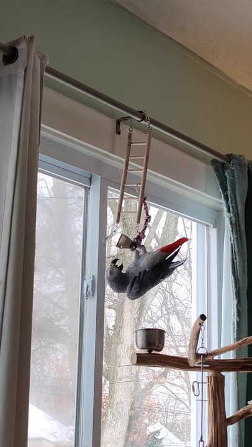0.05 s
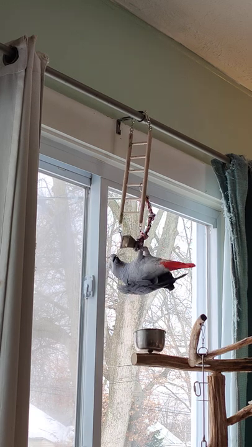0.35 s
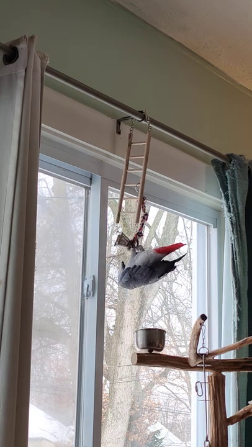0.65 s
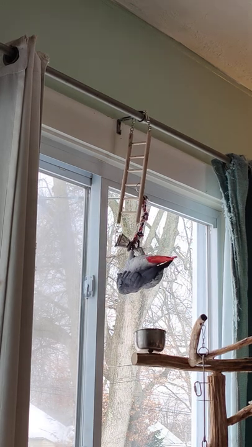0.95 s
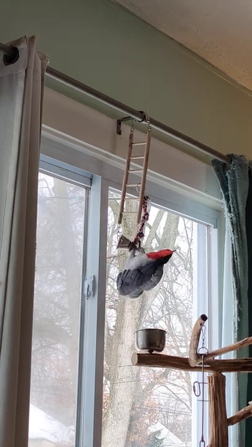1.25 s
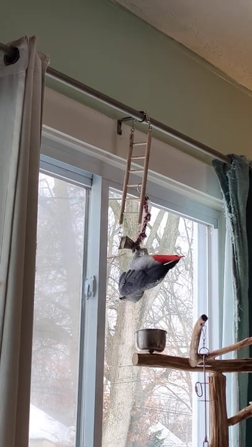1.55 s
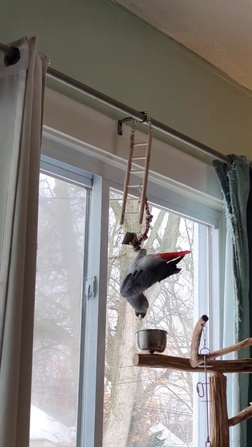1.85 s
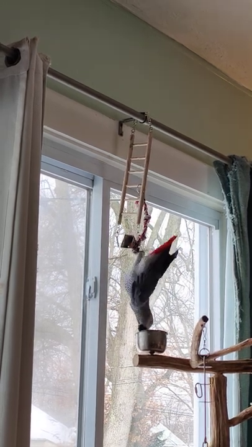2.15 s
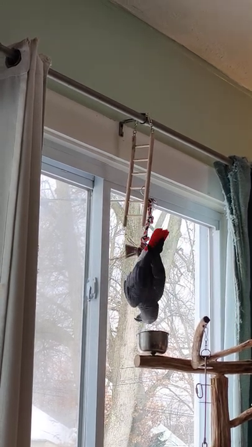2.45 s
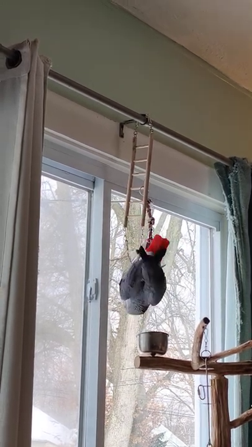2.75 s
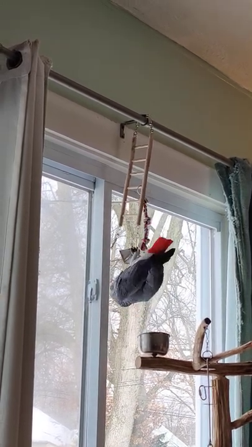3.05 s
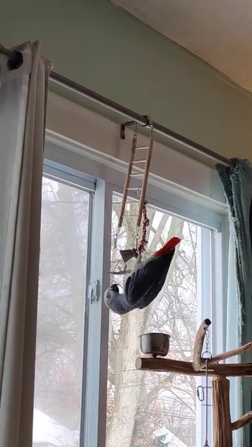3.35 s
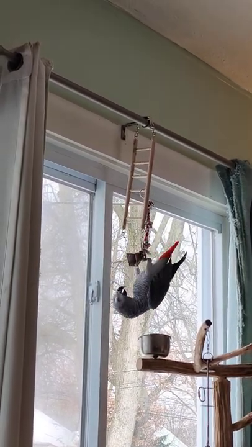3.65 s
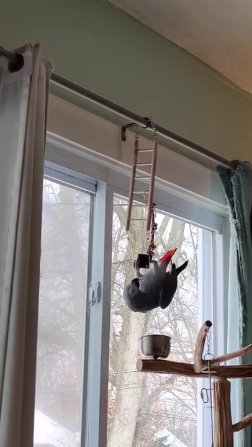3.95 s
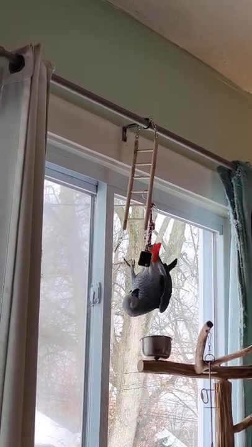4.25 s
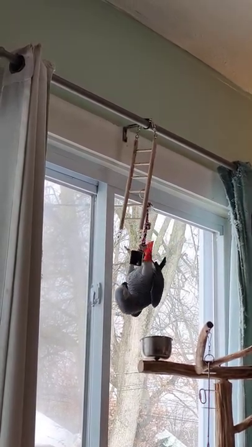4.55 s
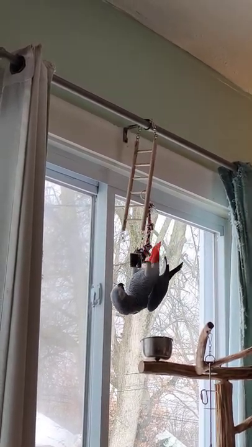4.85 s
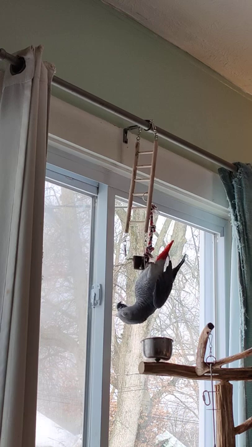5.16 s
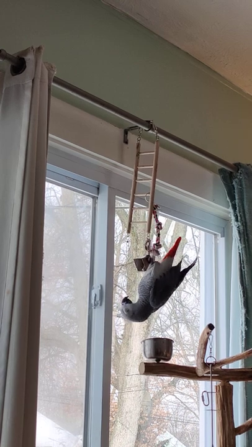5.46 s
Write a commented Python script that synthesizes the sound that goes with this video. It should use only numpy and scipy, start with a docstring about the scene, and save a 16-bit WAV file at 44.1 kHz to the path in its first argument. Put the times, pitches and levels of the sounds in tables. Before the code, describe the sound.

Bright, quickly damped clinks of a little toy bell, light claw ticks and a soft hoot as a parrot clambers, over faint ventilation hum.

```python
"""A small metal bell on a hanging toy, knocked by a clambering parrot in a quiet living room. The clapper
chatters and the bird's grip damps the ring; claws tick, the chain rustles, wooden parts knock and the beak
strikes the steel food bowl. A faint squeak and one soft hoot fall in between, over humming ventilation and a
faint hiss. One microphone, far enough from the toy to pick up more room than direct sound."""
import sys
import numpy as np
from scipy import signal
from scipy.fft import rfft, irfft, next_fast_len
from scipy.io import wavfile

SR = 44100
rng = np.random.default_rng(int(sys.argv[2]) if len(sys.argv) > 2 else 0)


def to_wav(s):
    """Save 16-bit WAV."""
    ch = np.atleast_2d(s).T  # columns
    pcm = np.round(np.clip(ch, -1, 1) * 32767)  # PCM
    wavfile.write(sys.argv[1], SR, pcm.astype(np.int16))


N = 247401
T = np.arange(SR // 2) / SR  # time within one hit, s

# clapper blows: t/s, strength/dB, hardness as tilt/(dB per octave), grip 0-1, place (-1 shoulder, 1 rim)
CLAPPER_BLOWS = [(.182, -37.5, 2, .25, -0.23), (.307, -36, -9, 0.99, 0), (.322, -34.5, -5, 0.9, -0.3),
                 (.372, -35, 6.5, 1, -0.61), (.488, -15.5, 1.5, 0.3, 0.33), (.524, -16, -3.5, .4, -0.3),
                 (.678, -37, 4, 0.5, 0.52), (.760, -42, -1.5, 0.98, -0.75), (.801, -19.5, 5, 0.18, 0.054),
                 (.812, -31, 5, 0.3, .2), (.930, -48, 5.5, 0.5, -1.3), (.957, -37.5, 0.5, 0.38, 0.3),
                 (1.050, -57.5, -10.5, 0.36, .5), (2.206, -40, 2, 0.8, -0.038),
                 (2.655, -37.5, 3.5, 0.29, 0.37), (2.730, -40.5, -2, .3, -0.35),
                 (2.798, -50, -3, 0.6, -0.2), (3.02, -52.5, -13, .8, 0.08), (3.176, -54, -1, 0.82, 0.73),
                 (3.530, -59.5, -6, 0.74, 0.23), (3.758, -29, -5, 0.5, -0.45),
                 (3.793, -41.5, 3, 0.3, -0.13), (3.975, -40.5, -10, .4, -1.05),
                 (4.045, -48, -7.5, 0.6, -1.4), (4.172, -47.5, -12, 0.41, -.8),
                 (5.122, -55.5, -4.5, 0.7, 0.064), (5.528, -53, -23, .3, 0.075),
                 (5.562, -50.5, 5, 0.63, -0.76)]
# bell modes, the strike note and three overtone groups: f/Hz, level/dB, t60/s
STRIKE_NOTE = [(2396, -3.5, .06), (2424, 0, .18)]
LOW_MODES = [(1357, -28, .33), (4338, -1, .15), (5005, 1, .17)]
MID_MODES = [(5500, -6, .17), (5803, 0, .13), (6045, -3, .14), (6260, -9, .07), (6790, -11, .03)]
TOP_MODES = [(7850, -13, .16), (8522, -21, .08), (9160, -5, .05), (9250, -1.5, .09), (9650, -15, .04),
             (10563, 0, .16), (11640, -8, .09), (11900, -13, .04), (12503, 1, .12), (12660, -11, .05),
             (13100, -11, .05), (13931, -9, .05), (14006, -2, .12), (14720, -20, .04), (15400, -18, .03)]
# low, mid and top group against the note: hanging free/dB, added by full grip/dB, added at the rim/dB
OVERTONE_BALANCE = [(-9.5, -8.5, 8.5), (-19.5, 4.5, -8.5), (-12.5, -1, 0.5)]
# beak and claw strokes on the toy: t/s, strength/dB
CLAW_STROKES = [(2.395, -47), (2.48, -45.5), (2.902, -49.5), (3.145, -53.5), (3.348, -51), (3.375, -42.5),
                (3.682, -52), (3.902, -51), (4.784, -49), (4.849, -55), (5.081, -56.5), (5.298, -53.5),
                (5.374, -46), (5.394, -47), (5.486, -64)]
# modes of one chain link: f/Hz, level/dB, t60/s
LINK_MODES = [(4840, -4.5, 0.08), (6295, 3, .04), (7220, 0, .04), (7960, -9.5, .03)]
# links shifting under the bird: t/s, level/dB
CHAIN_MOTION = [(2.3, -71), (2.66, -64.5), (2.97, -75), (3.49, -76), (3.97, -70), (4.12, -72.5),
                (4.41, -80), (5.36, -81.5), (5.49, -67), (5.61, -67)]
# knocks: wooden parts colliding, and at 2.146 s the beak striking the steel food bowl: t/s, strength/dB, snap
# against the knock/dB
CLACKS = [(.322, -49, -3), (2.146, -41, -3.5), (2.205, -47, 2)]
# spectra: f/Hz, relative density/dB
CRACK_SPECTRUM = [(300, -46.5), (900, -25), (1500, -13), (2400, 11), (3600, -4.5), (5800, 4.5),
                  (7500, -5.5), (10000, -3.5), (13500, -4), (16000, -4.5)]  # clapper on the bell wall
CLAW_SPECTRUM = [(500, 1.5), (1500, -1.5), (2500, 4.5), (3400, 5), (4100, 2.5), (4700, 6.5), (5400, -14.5),
                 (6200, 3), (7200, 1), (8600, -7.5), (10500, -2.5), (12500, -10), (15500, -5.5)]  # beak and claws on the toy
CHAIN_SPECTRUM = [(1500, -10.5), (3400, 3), (4100, -10.5), (4750, 4.5), (5500, -9), (6200, 0), (7100, -1),
                  (8600, -12.5), (11000, -9.5), (15000, -15.5)]  # link against link
WOOD_SPECTRUM = [(400, -34), (720, -15), (950, 0), (1300, 3), (1600, 0.5), (1950, 1), (2300, -15.5),
                 (4000, -22), (8000, -37), (12000, -44)]  # hollow body of a knock
SNAP_SPECTRUM = [(3000, -28), (8300, -17.5), (9600, 0.5), (11500, -3.5), (13700, 4), (16000, 0)]  # its bright edge
AIR_SPECTRUM = [(13, -44.5), (22, -13), (108, -7.5), (146, -19), (257, -4.5), (285, -6.5), (354, -15.5),
                (391, -15.5), (584, -25), (1200, -47), (1560, -72.5), (2640, -120)]  # ventilation airflow
HISS_SPECTRUM = [(530, -27), (900, -1.5), (1920, -5), (3130, -13.5), (4820, -19.5), (5630, -25.5),
                 (6990, -17.5), (8780, -19.5), (9660, -17.5), (14900, -16), (15800, -10.5)]  # background hiss
# duct and fan resonances: f/Hz, width/Hz, level/dB
DUCT_RESONANCES = [(40.8, 10, -57.5), (122, 22, -59.5), (219, 43, -61.5), (259.27, 4, -51.5),
                   (343.5, 30, -58.5), (367, 32, -58), (449, 64, -60.5), (543.4, 84, -62), (783, 87, -70.5)]
# living room reverberation: f/Hz, t60/s
ROOM_DECAY = [(200, 0.19), (1400, 0.44), (2400, 0.37), (6000, 0.3), (10000, 0.25), (16000, 0.26)]


def bell(crack_db=-18, crack_grip_db=14, crack_octaves=1.1):
    """Harder blows favour high modes; rebounds stir only the mid and top groups and the metal's crack."""
    out = np.zeros(N)
    for s, db, hardness, grip, place in CLAPPER_BLOWS:
        path = room_path(direct_db=-8)
        rattle = signal.fftconvolve(path, chatter())
        add(out, s, amp(db) * ring(STRIKE_NOTE, grip, path, swell_cycles=8))
        groups = zip((LOW_MODES, MID_MODES, TOP_MODES), OVERTONE_BALANCE, (path, rattle, rattle))
        for modes, (free_db, grip_db, rim_db), drive in groups:
            group_db = free_db + grip_db * grip + rim_db * place + hardness * octaves_up(modes)
            add(out, s, amp(db + group_db) * ring(modes, grip, drive))
        crack = at_mic(struck(burst(t60=.0078), CRACK_SPECTRUM), rattle)
        add(out, s, amp(db + crack_db + crack_grip_db * grip + hardness * crack_octaves) * crack)
    return out


def ring(modes, grip, path, swell_cycles=3.5, grip_damping=1.4, grip_sharpening=.018):
    """Metal modes ring as damped sines; a grip stiffens the metal, raising the pitch, and damps it."""
    hz, db, t60 = np.transpose(modes)[:, :, None]
    size = amp(db + rng.standard_normal(hz.shape))
    swell = 1 - np.exp(-T * hz / swell_cycles)
    fade = amp(-60 * T * np.exp(grip_damping * grip) / t60)
    partials = swell * fade * np.sin(2 * np.pi * hz * (1 + grip_sharpening * grip ** 2) * T)
    sign = rng.choice([-1, 1], hz.shape)  # depends on where the blow lands
    return unit_hit(np.sum(sign * size * at_mic(partials, path), axis=0))


def chatter(gap_s=.007, bounce_db=-4, rebounds=6):
    """A contact and its weaker rebounds at uneven gaps."""
    delays = np.cumsum(gap_s * rng.uniform(.5, 1.5, rebounds))
    samples = np.round(np.r_[0, delays] * SR).astype(int)
    return np.bincount(samples, amp(bounce_db * np.arange(rebounds + 1)))


def octaves_up(modes):
    """How far a group of modes lies above the strike note."""
    hz, db, _ = np.transpose(modes)
    return np.average(np.log2(hz / STRIKE_NOTE[-1][0]), weights=amp(db))


def claws(grit_db=-14, clink_db=-19.5, rise_s=.0092, size_spread=.0703):
    """Short gritty strokes of beak and claws, each jolting a link of slightly different size."""
    out = np.zeros(N)
    for s, db in CLAW_STROKES:
        path = room_path()
        grit = burst(t60=.06) * rng.exponential(1, len(T)) * (1 - np.exp(-T / rise_s))
        add(out, s, amp(db + grit_db) * at_mic(struck(grit, CLAW_SPECTRUM), path))
        link = np.array(LINK_MODES) * [np.exp(size_spread * rng.standard_normal()), 1, 1]
        rattle = signal.fftconvolve(path, chatter())
        add(out, s, amp(db + clink_db) * ring(link, grip=0, path=rattle))
    return out


def chain(contacts_per_s=260):
    """Many tiny contacts of links and beads blur into a rustle."""
    contacts = (rng.random(N) < contacts_per_s / SR) * rng.standard_normal(N)
    in_room = signal.fftconvolve(contacts, room_path())[:N]
    level_db = np.interp(np.arange(N) / SR, *np.transpose(CHAIN_MOTION), left=-120, right=-120)
    return amp(level_db) * unit(coloured(in_room, CHAIN_SPECTRUM))


def knocks():
    """Wooden parts of the toy collide, and once the beak strikes the steel food bowl: a hollow clack with a
    bright snap on top."""
    out = np.zeros(N)
    for s, db, snap_db in CLACKS:
        path = room_path()
        add(out, s, amp(db) * at_mic(struck(burst(t60=.003), WOOD_SPECTRUM), path))
        add(out, s, amp(db + snap_db) * at_mic(struck(burst(t60=.02), SNAP_SPECTRUM), path))
    return out


def hoot(start_s=3.705, length_s=.37, pitch_hz=406.5, sag_hz_per_s=60, gain_db=-36, fade_db_per_s=-16):
    """A soft, dry tone with a faint octave; it swells, fades and sinks a little."""
    out = np.zeros(N)
    phase = 2 * np.pi * np.cumsum(pitch_hz - sag_hz_per_s * T) / SR
    tone = np.sqrt(2) * (np.sin(phase) + amp(-28) * np.sin(2 * phase))
    swell = np.sin(np.pi * np.minimum(T / length_s, 1)) * amp(gain_db + fade_db_per_s * T)
    add(out, start_s, swell * tone)
    return out


def squeak(start_s=1.335, length_s=.02, pitch_hz=790, gain_db=-57):
    """A faint short squeak as the toy swings."""
    out = np.zeros(N)
    tone = np.sin(2 * np.pi * pitch_hz * T) * np.sin(np.pi * np.minimum(T / length_s, 1))
    add(out, start_s, amp(gain_db) * at_mic(tone, room_path(direct_db=-5)))
    return out


def ventilation(air_db=-50):
    """Room tone: broad air noise and the narrow hum of duct and fan resonances."""
    out = amp(air_db) * unit(coloured(rng.standard_normal(N), AIR_SPECTRUM))
    for centre, width, db in DUCT_RESONANCES:
        hum = filtered(rng.standard_normal(N), lambda hz: 1 / (1 + ((hz - centre) / width * 2) ** 2))
        out += amp(db) * unit(hum)
    return out


def hiss(level_db=-67):
    """A faint steady noise floor behind everything."""
    return amp(level_db) * unit(coloured(rng.standard_normal(N), HISS_SPECTRUM))


def room_path(direct_db=-7):
    """Toy to microphone: direct sound and diffuse tail; the toy swings, so each hit takes a new path."""
    hz, t, noise = signal.stft(rng.standard_normal(len(T)), SR, nperseg=256)
    decay = amp(-60 * t / along(ROOM_DECAY, hz)[:, None])
    tail = signal.istft(noise * decay, SR, nperseg=256)[1][:len(T)]
    return tail / np.linalg.norm(tail) + amp(direct_db) * (T == 0)


def at_mic(x, path):
    """A hit carried along a path to the microphone, at level 1."""
    return unit_hit(irfft(rfft(x) * rfft(path, len(T)), len(T)))


def struck(x, spectrum):
    """A hit through a body with a (f/Hz, level/dB) spectrum, which rings only after the contact."""
    log_gain = np.log(amp(along(spectrum, np.fft.rfftfreq(len(T), 1 / SR))))
    cepstrum = irfft(log_gain, len(T))
    cepstrum[1:] *= 2 * (T[1:] < T[-1] / 2)  # minimum phase
    return irfft(rfft(x) * np.exp(rfft(cepstrum)), len(T))


def burst(t60):
    """Noise that falls 60 dB in t60 seconds."""
    return rng.standard_normal(len(T)) * amp(-60 * T / t60)


def amp(db):
    """Decibels to gain."""
    return 10 ** (np.asarray(db) / 20)


def unit(x):
    """Scale to rms 1."""
    return x / np.sqrt(np.mean(x ** 2) + 1e-20)


def unit_hit(x):
    """Scale each hit to the energy of 50 ms at rms 1."""
    return x / np.sqrt(np.sum(x ** 2, axis=-1, keepdims=True) / (SR / 20) + 1e-20)


def along(points, hz):
    """Interpolate (f/Hz, value) points on a log frequency axis."""
    f, value = np.transpose(points)
    return np.interp(np.log(hz + 1), np.log(f + 1), value)


def filtered(x, response):
    """x through a gain that depends on frequency."""
    size = next_fast_len(len(x) + 8192)
    return irfft(rfft(x, size) * response(np.fft.rfftfreq(size, 1 / SR)), size)[:len(x)]


def coloured(x, spectrum):
    """x through a (f/Hz, level/dB) spectrum."""
    return filtered(x, lambda hz: amp(along(spectrum, hz)))


def add(track, s, x):
    """Mix x into the track at s seconds."""
    start = round(s * SR)
    track[start:start + len(x)] += x[:N - start]


def scene():
    """The toy and the living room from one microphone position."""
    noise_floor = hiss()
    return (bell() + claws() + chain() + knocks() + hoot() + squeak() + ventilation() + noise_floor)[None]


def record(dry):
    """The sound fades in from silence; the microphone loses the deepest bass and the highest treble."""
    low_cut_hz, top_hz = 27, 15900
    fade_db = np.interp(np.arange(N) / SR, [.17, .185, .22, .26, .31, .4], [-120, -42.5, -26, -11.5, -2.5, -1])
    faded = dry[0] * amp(fade_db)
    return filtered(faded, lambda hz: (hz < top_hz) * hz ** 4 / (hz ** 4 + low_cut_hz ** 4))[None]


dry = scene()
out = record(dry)
to_wav(out)
```